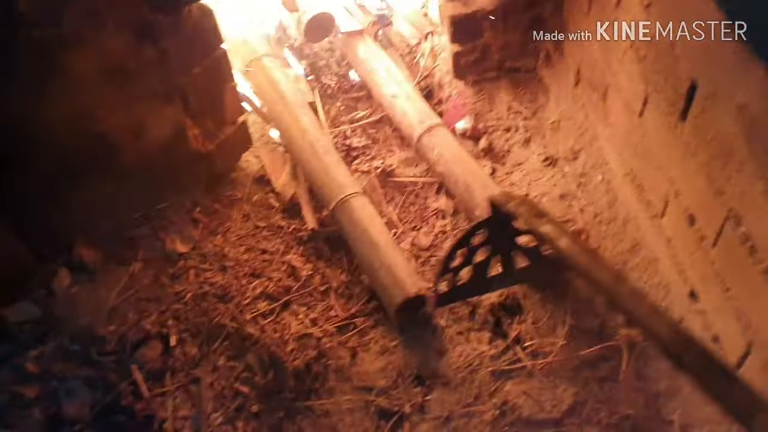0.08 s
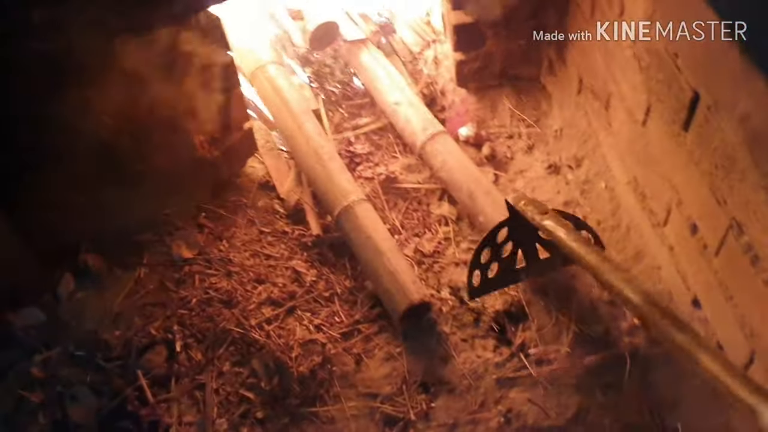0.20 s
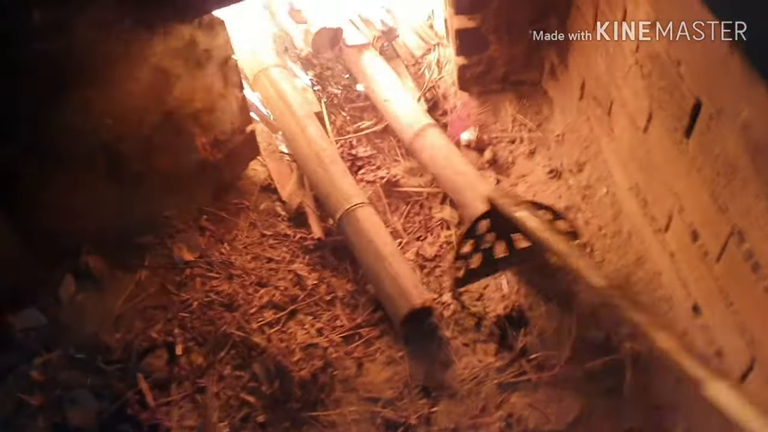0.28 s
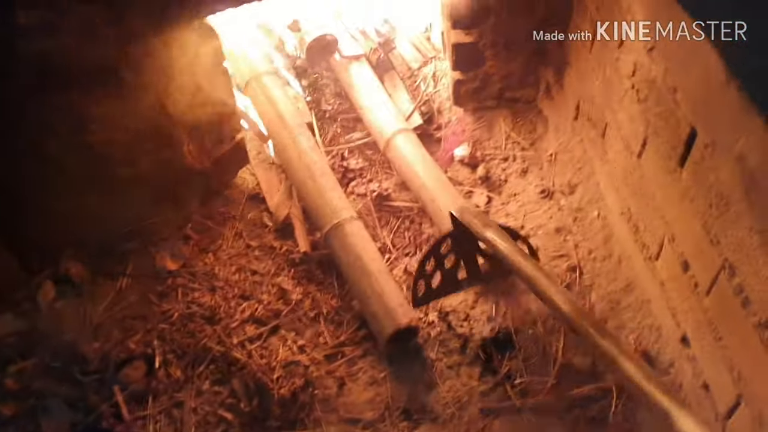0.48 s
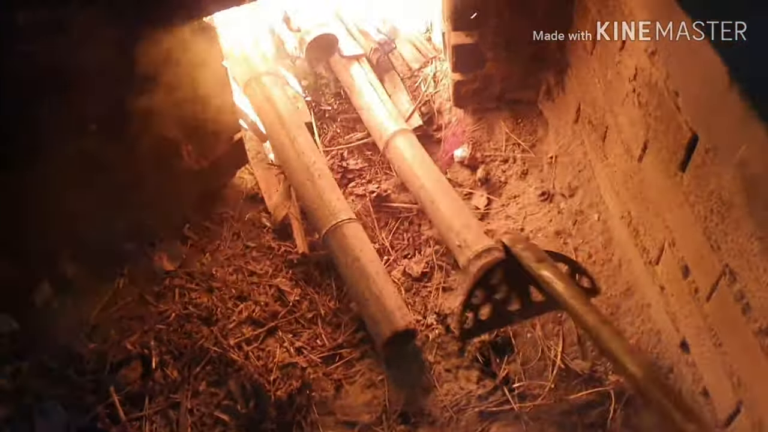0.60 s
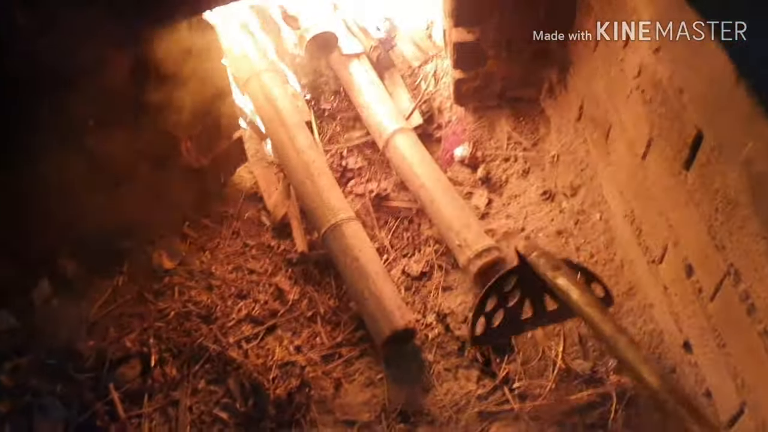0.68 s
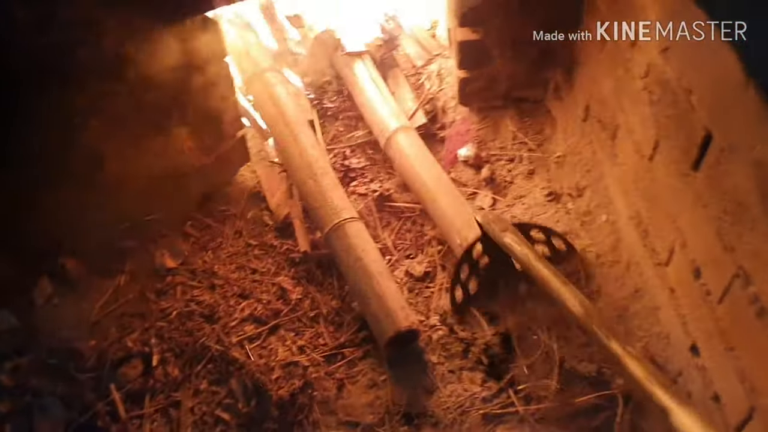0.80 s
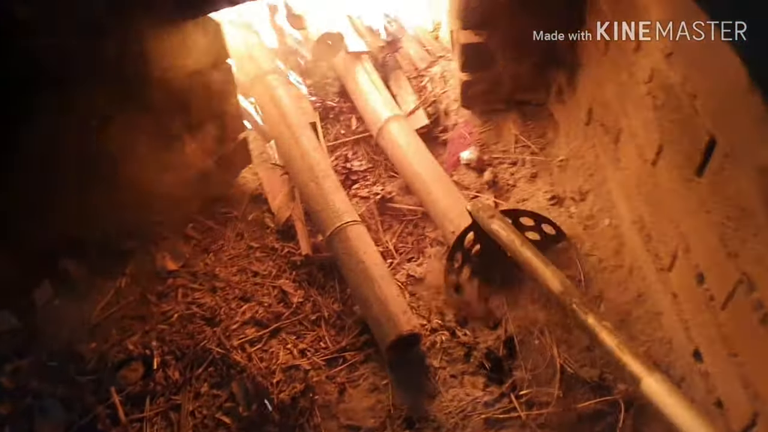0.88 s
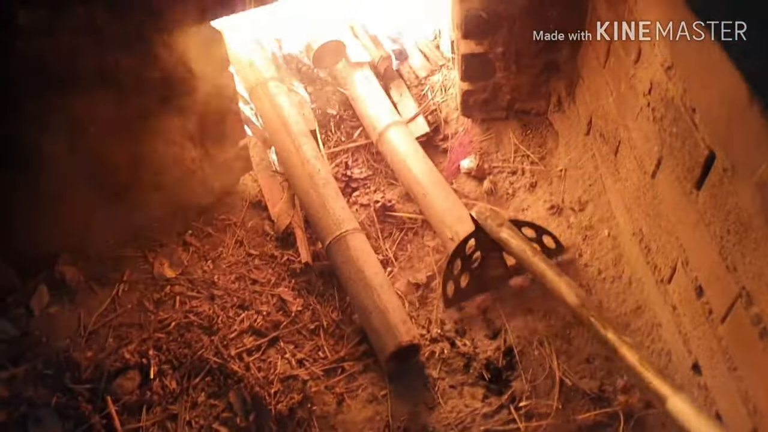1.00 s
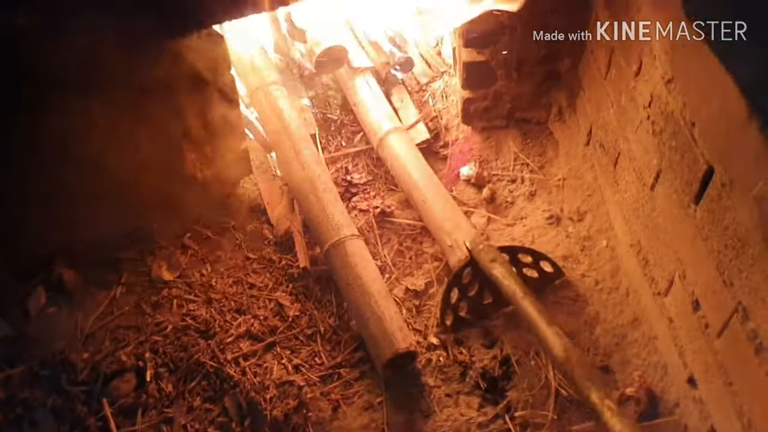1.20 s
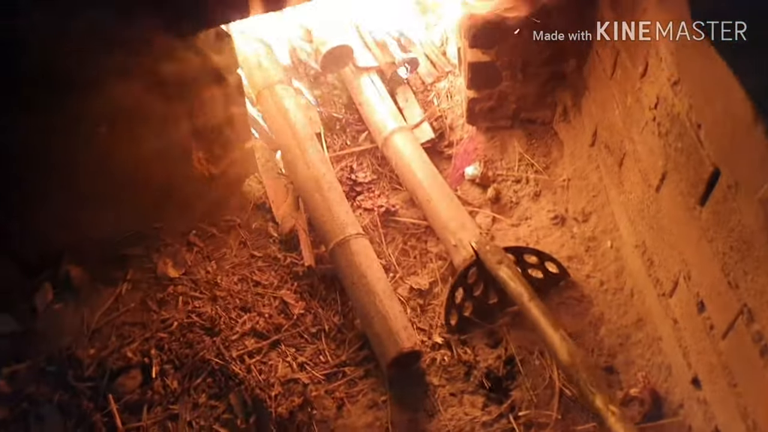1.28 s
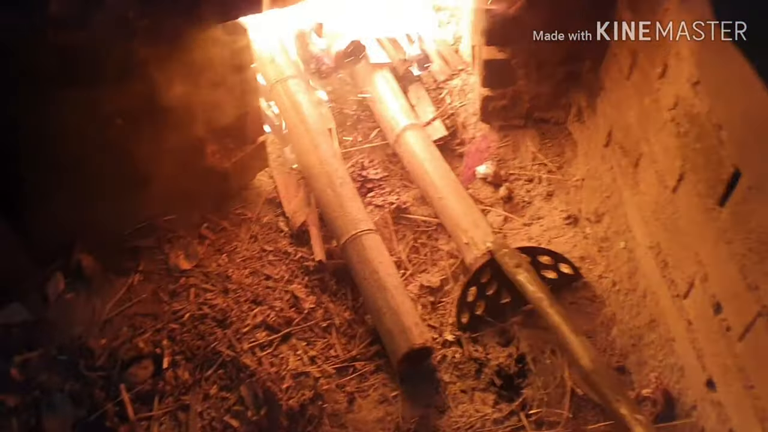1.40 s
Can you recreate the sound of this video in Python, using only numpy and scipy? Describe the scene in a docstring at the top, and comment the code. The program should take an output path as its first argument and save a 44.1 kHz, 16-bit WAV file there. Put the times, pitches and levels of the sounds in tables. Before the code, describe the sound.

Bamboo cracks in a close, hard-walled firebox. Low flames flutter quietly until a loud hollow pop at 0.25 seconds, with woody knocks at 0.30, 0.35 and 0.42. A dry snap comes at 0.60. At 0.79 to 0.87 a bright tearing split and heavy pops ring briefly. Short echoes die away; faint steam hiss, ember ticks and tiny clicks remain from 1.08 to 1.32.

```python
"""Bamboo canes burst and split in the mouth of a brick firebox, heard from close by between hard walls.
Pops, snaps and a long tear are shaped bursts of grainy noise; a hollow resonance colours the pops.
Decaying sines add the hum of the tubes and the ring of the torn cane wall.
Each crack is followed by filtered noise that builds, holds and dies like reflections in a yard.
Behind them, fluttering low noise is the flames, bright noise is the steam, sparse clicks are the embers."""
import sys
import numpy as np
from scipy import signal
from scipy.fft import rfft, irfft
from scipy.io import wavfile
from scipy.ndimage import uniform_filter1d

SR = 44100
rng = np.random.default_rng(int(sys.argv[2]) if len(sys.argv) > 2 else 0)


def master_out(mix):
    """Clip the mix to full scale and print it as 16-bit PCM to the path in sys.argv[1]."""
    frames = np.transpose(np.atleast_2d(mix))
    ceiling = np.clip(frames, -1, 1)
    pcm = np.round(ceiling * 32767).astype(np.int16)
    wavfile.write(sys.argv[1], SR, pcm)


N = 61740
T = np.arange(N) / SR
SIZE = 2 ** 17   # FFT length in samples
HZ = np.maximum(np.arange(SIZE // 2 + 1) * SR / SIZE, 1)
OCTAVES = np.log2(np.maximum(HZ, 300) / 1000)   # octaves from 1 kHz, flat below 300 Hz

# Left-right likeness of the reflections and the fire. Each row: frequency in Hz, correlation.
DIFFUSE_LIKENESS = [(60, 1), (160, .95), (300, 0.86), (600, 0.64), (1200, -0.17), (2500, 0.12),
                    (8000, -0.1), (15000, -0.006)]


def pops():
    """Steam bursts a cane wall and the hollow behind it resonates; lesser knocks follow."""
    # Each row: start in seconds, level in dB, swell in s, fall in s, pitch in Hz, resonance in dB,
    # tilt in dB per octave, reverberation in dB relative to the direct sound, left-over-right pan in dB.
    pop_events = [(.2470, -8, 0.0051, 0.0054, 1274, 16, -1, -11, -1.5),
                  (0.258, -24.5, 0.0032, 0.0037, 660, 14, -3, -25, -5),
                  (.2870, -44, 0.0022, 0.0051, 760, 24, 6, -12, 9),
                  (0.3047, -15, 0.0012, 0.0085, 812, 23.5, 0.5, -14.5, 2),
                  (.3525, -23, 0.002, 0.0066, 718, 20, 0.5, -11, -2),
                  (.4185, -22.5, 0.0012, 0.0058, 500, 22.5, -0.5, -25, -2),
                  (.4690, -34.5, 0.0043, 0.014, 485, 15, -2, -20, 2),
                  (0.7904, -14.5, 0.0022, 0.0074, 1490, 6.5, 2, -11.5, 0),
                  (0.8296, -14, 0.0062, 0.0078, 1120, 6, 0.5, -9, -2),
                  (.8745, -19, 0.0023, 0.013, 680, 8.5, 2.5, -12, -1),
                  (.9380, -33, 0.0027, .007, 380, 13, 0.5, -17.5, 1),
                  (1.1315, -36.5, .001, 0.0036, 830, 7, -2, -10.5, 3.5),
                  (1.159, -42, 0.014, 0.014, 596, 10, -2.5, -26, 3.5),
                  (1.1700, -38.5, 0.0022, 0.013, 2100, 12, 2.5, -23, -4),
                  (1.3210, -41.5, 0.0019, 0.0044, 1400, 1.5, 1.5, -19, -2)]
    # Basic tone of the direct pop. Each row: frequency in Hz, relative density in dB per Hz.
    pop_colour = [(40, -50), (100, -35.5), (170, -10), (250, -2), (400, -4), (750, -3.5), (1400, -6.5),
                  (2600, -8.5), (5000, -15.5), (9000, -22), (15500, -33)]
    # Basic tone of its reflections. Each row: frequency in Hz, relative density in dB per Hz.
    tail_colour = [(40, -37), (100, -40), (170, -16.5), (250, -10.5), (380, -11.5), (560, -2.5),
                   (780, -1.5), (980, -6.5), (1250, -5), (2300, -9.5), (3600, -17.5), (6000, -22.5),
                   (10000, -22.5), (15500, -22.5)]
    resonance_octaves = 0.34   # half-width of the resonance, at half its dB height
    out = 0
    for start, db, swell, fall, pitch, resonance_db, tilt_db, wet_db, pan_db in pop_events:
        hollow = resonance_db / (1 + (np.log2(HZ / pitch) / resonance_octaves) ** 2)
        tilt = tilt_db * OCTAVES
        direct = burst(at_hz(pop_colour) + hollow + tilt, swell, fall, pan_db)
        tail = yard(at_hz(tail_colour) + tilt, swell)
        out = out + from_db(db) * delayed(direct + from_db(wet_db) * tail, start)
    return out


def tube():
    """The air in a burst or knocked cane hums on as decaying sines."""
    # Hollow notes. Each row: start in seconds, frequency in Hz, level in dB, t60 in seconds.
    tube_notes = [(.249, 1216, -12.5, 0.03), (0.2525, 1470, -20, 0.019), (0.255, 254.6, -23, 0.16),
                  (.259, 780, -24.5, 0.34), (.259, 836.5, -21.5, 0.39), (.419, 503.5, -30.5, 0.18),
                  (.419, 445.3, -37, 0.29), (0.792, 1542, -20.5, 0.17), (.834, 1104, -18, .12),
                  (.834, 683, -21, 0.17), (0.833, 192.6, -35.5, .15), (0.833, 394, -30, 0.24)]
    swell_s = 0.0023
    hum = 0
    for start, hz, db, t60 in tube_notes:
        note = ring(hz, t60, swell_s)[:1]   # one channel, placed by from_right
        hum = hum + delayed(from_db(db) * note, start)
    return from_right(hum)


def split():
    """A crack runs along a cane and sets its stiff wall ringing unevenly."""
    # Ringing of the cane wall. Each row: frequency in Hz, level in dB before wall_db, t60 in seconds.
    wall_modes = [(2333, -30, .3), (2699, -29, .3), (3215, -30, .3), (3458, -32, .3), (3728, -29, .22),
                  (4215, -31, .22), (6093, -28, .28), (6977, -35, .22), (8231, -34, .25), (8480, -38, .35),
                  (9782, -27, .18), (11222, -29, .18), (11638, -31, .2), (15300, -28, .2)]
    # Basic tone of the tear. Each row: frequency in Hz, relative density in dB per Hz.
    tear_colour = [(100, -35), (300, -6), (700, -1.5), (1100, -11), (1900, -5.5), (2800, -5.5),
                   (4200, -2.5), (5200, -5), (7000, -6.5), (9000, -10), (11500, -3.5), (15500, -9)]
    start_s, swell_s, fall_s = .7912, .017, .012
    tear_db, wet_db, pan_db = -13.5, -10.5, -2.5
    peak_db, peak_width_hz = 8.5, 87   # the tearing noise is strongest around the wall's modes
    wall_db, wall_swell_s = 1, 0.015
    waver_hz, waver_depth = 35.3, 1

    peaks = np.max([np.exp(-((HZ - hz) / peak_width_hz) ** 2) for hz, _, _ in wall_modes], axis=0)
    spectrum = at_hz(tear_colour) + peak_db * peaks
    direct = burst(spectrum, swell_s, fall_s, pan_db)
    tear = direct + from_db(wet_db) * yard(spectrum, swell_s)
    wall = 0
    for hz, mode_db, t60 in wall_modes:
        # each mode wavers at random, separately in each ear
        waver = rms_one(1 + waver_depth * np.array([drift(waver_hz), drift(waver_hz)]))
        wall = wall + from_db(wall_db + mode_db) * waver * ring(hz, t60, wall_swell_s)
    return delayed(from_db(tear_db) * tear + wall, start_s)


def snaps():
    """Single fibres part with a very short, dry click."""
    # Each row: start in seconds, level in dB, swell in s, fall in s, tilt in dB per octave,
    # reverberation in dB relative to the direct sound, left-over-right pan in dB.
    snap_events = [(.1470, -57.5, .001, .002, -2, -9, 5), (0.2512, -20.5, 0.0011, .0017, -5, -16.5, -26),
                   (0.6015, -16, 0.0014, 0.0016, 1, -9.5, -3),
                   (1.0830, -41, 0.00084, 0.0035, 0.5, -10.5, 0),
                   (1.1640, -32.5, .0005, 0.0045, 2, -19, -1)]
    # Basic tone of a snap. Each row: frequency in Hz, relative density in dB per Hz.
    snap_colour = [(100, -26), (350, -14), (630, -1.5), (850, -9.5), (1600, -6.5), (2300, -3), (4300, -1.5),
                   (5600, -5), (8000, -3.5), (11500, -1.5), (15500, -5.5)]
    out = 0
    for start, db, swell, fall, tilt_db, wet_db, pan_db in snap_events:
        spectrum = at_hz(snap_colour) + tilt_db * OCTAVES
        direct = burst(spectrum, swell, fall, pan_db)
        tail = yard(spectrum, swell)
        out = out + from_db(db) * delayed(direct + from_db(wet_db) * tail, start)
    return out


def jet():
    """A thin jet of steam sings faintly through the fresh split: high, narrow-toned noise."""
    # Loudness over time. Each row: time in seconds, level in dB.
    jet_level = [(1.03, -83), (1.12, -49), (1.2, -52.5), (1.4, -52)]
    # Tone of the jet. Each row: frequency in Hz, relative density in dB per Hz.
    jet_colour = [(3000, -23), (6500, -5), (10000, -9.5), (13500, -1), (14500, 3.5), (15400, -6.5)]
    return level_curve(jet_level) * rms_one(colour(stereo_noise(DIFFUSE_LIKENESS), at_hz(jet_colour)))


def steam_and_embers():
    """Steam hisses from the canes as noise; embers tick as random sparse clicks of the same tone."""
    # Loudness of the hiss over time. Each row: time in seconds, level in dB.
    steam_level = [(0, -68.5), (.15, -84), (.24, -54), (.45, -49), (.58, -50.5), (.78, -51.5), (1.06, -54),
                   (1.17, -49), (1.27, -52.5), (1.4, -54)]
    # Tone of hiss and ticks. Each row: frequency in Hz, relative density in dB per Hz.
    steam_colour = [(300, -14), (600, -6.5), (1400, 5), (3000, -1.5), (4500, 6), (7000, -9), (11000, -11.5),
                    (14500, -12), (15600, -7)]
    ticks_per_s, ticks_db = 53, -14.5   # level relative to the hiss
    spectrum = at_hz(steam_colour)
    clicks = (rng.random(N) < ticks_per_s / SR) * rng.standard_normal((2, N))
    ticks = rms_one(colour(clicks, spectrum))
    hiss = rms_one(colour(stereo_noise(DIFFUSE_LIKENESS), spectrum))
    return level_curve(steam_level) * (hiss + from_db(ticks_db) * ticks)


def flames():
    """Flames rumble as low noise whose level flutters at random."""
    # Loudness before the flutter. Each row: time in seconds, level in dB.
    flame_level = [(0, -48), (.15, -47), (.25, -50), (.44, -39.5), (.62, -48.5), (.85, -46), (1.1, -51),
                   (1.4, -48.5)]
    # Tone of the rumble. Each row: frequency in Hz, relative density in dB per Hz.
    flame_colour = [(25, -24), (55, -0.5), (105, -1.5), (160, -6.5), (240, -10), (400, -16.5), (600, -19),
                    (1000, -25.5), (3000, -33.5), (7000, -41.5), (15000, -38.5)]
    flutter_db, flutter_hz = 2, 20.4
    flutter = from_db(flutter_db * drift(flutter_hz))
    rumble = rms_one(colour(stereo_noise(DIFFUSE_LIKENESS), at_hz(flame_colour)))
    return level_curve(flame_level) * flutter * rumble


def yard(spectrum, swell):
    """Reflections of one crack: they build up, hold briefly and die away band by band."""
    # Reverberation of the yard. Each row: band centre in Hz, t60 in seconds.
    yard_t60 = [(150, 0.58), (600, 0.32), (1500, 0.38), (4000, 0.35), (9000, 0.27), (15000, 0.16)]
    build_s, hold_s = 0.006, 0.042   # the crack's own swell lengthens the build-up
    noise = rms_one(colour(stereo_noise(DIFFUSE_LIKENESS), spectrum + ripple()))
    noise_spectrum = rfft(noise, SIZE)
    centres, t60s = np.transpose(yard_t60)
    out = 0
    for share, t60 in zip(np.eye(len(centres)), t60s):
        # overlapping triangular bands that add up to the whole
        weight = np.interp(np.log(HZ), np.log(centres), share)
        band = irfft(noise_spectrum * weight)[:, :N]
        out = out + band * from_db(-60 * np.maximum(T - hold_s, 0) / t60)
    return out * (1 - np.exp(-(T / (build_s + swell)) ** 2))


def ripple():
    """Random narrow peaks and dips that the firebox gives the reflections, fading out in the bass, in dB."""
    ripple_db, spacing_hz = 3, 70
    knots = rng.standard_normal(size=1000)
    bumps = np.interp(HZ / spacing_hz, np.arange(len(knots)), knots)
    return ripple_db * bumps * np.clip(OCTAVES + 1, 0, 1)


def burst(spectrum, swell, fall, pan_db):
    """A run of tiny uneven fractures that swells and dies; about rms 1 at its height before panning."""
    # Left-right likeness of the direct sound. Each row: frequency in Hz, correlation.
    direct_likeness = [(200, 1), (700, 0.94), (1400, 0.64), (3000, 0.21), (8000, 0.028)]
    grain_db = 4   # spread of the fractures' level
    shape = np.minimum(T / swell, 1) * np.exp(-np.maximum(T - swell, 0) / fall)
    unevenness = rms_one(uniform_filter1d(rng.standard_normal(N), size=12))
    grains = from_db(grain_db * unevenness)
    sound = from_right(colour(stereo_noise(direct_likeness) * grains * shape, spectrum))
    pan = from_db([[pan_db / 2], [-pan_db / 2]])
    return rms_one(sound) * np.sqrt(np.mean(shape ** 2)) * pan


def ring(hz, t60, swell):
    """One decaying mode, with unrelated phases in its two channels."""
    phase = rng.uniform(0, 2 * np.pi, (2, 1))
    decay = from_db(-60 * np.maximum(T - swell, 0) / t60)
    return np.sin(2 * np.pi * hz * T + phase) * np.minimum(T / swell, 1) * decay


def from_right(x):
    """The canes lie a little to the right, so their sound reaches the left ear slightly later."""
    left_lag_s = .00011
    return np.array([np.interp(T - left_lag_s, T, x[0], left=0), x[-1]])


def stereo_noise(likeness):
    """White noise whose left-right correlation follows a table over frequency."""
    mid, side = rfft(rng.standard_normal((2, N)), SIZE)
    alike = np.clip(at_hz(likeness), -.99, .99)
    mid, side = mid * np.sqrt(1 + alike), side * np.sqrt(1 - alike)
    return irfft([mid + side, mid - side])[:, :N]


def colour(x, db):
    """Causal (minimum-phase) filter with the given gain curve, built by folding its cepstrum."""
    cepstrum = irfft(np.log(from_db(db)))
    cepstrum[1:SIZE // 2] *= 2
    cepstrum[SIZE // 2 + 1:] = 0
    return irfft(rfft(x, SIZE) * np.exp(rfft(cepstrum)))[..., :N]


def drift(rate):
    """Smooth random wander with rms 1: noise through a two-pole low-pass at rate Hz."""
    r = np.exp(-2 * np.pi * rate / SR)
    wander = signal.lfilter([1], [1, -2 * r, r * r], rng.standard_normal(2 * N))
    return rms_one(wander[N:])   # the settling half is dropped


def delayed(x, s):
    """Move a sound to its starting time."""
    return np.pad(x, ((0, 0), (max(int(s * SR), 0), 0)))[:, :N]


def level_curve(points):
    """Gain over time from a table of seconds and dB."""
    return from_db(np.interp(T, *np.transpose(points)))


def at_hz(points):
    """Read a table on a log-frequency axis."""
    f, v = np.transpose(points)
    return np.interp(np.log(HZ), np.log(f), v)


def from_db(db):
    """Decibels to gain."""
    return 10 ** (np.asarray(db) / 20)


def rms_one(x):
    """Scale to rms 1."""
    return x / np.sqrt(np.mean(x ** 2) + 1e-20)


def scene():
    """Cracks over the burning fire."""
    cracks = pops() + tube() + split() + snaps()
    fire = jet() + steam_and_embers() + flames()
    return cracks + fire


def record(dry):
    """Peaks are rounded by soft saturation and the top is cut steeply."""
    cutoff_hz = 15700
    low_pass = signal.ellip(12, .1, 90, cutoff_hz, fs=SR, output="sos")
    return signal.sosfilt(low_pass, np.tanh(dry))


dry = scene()
out = record(dry)
master_out(out)
```